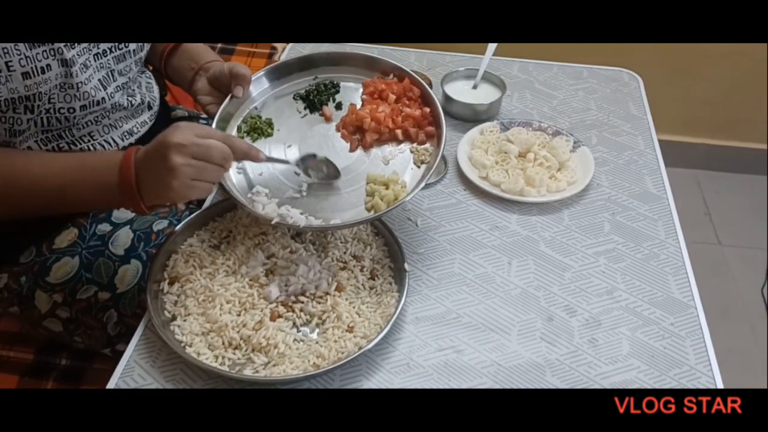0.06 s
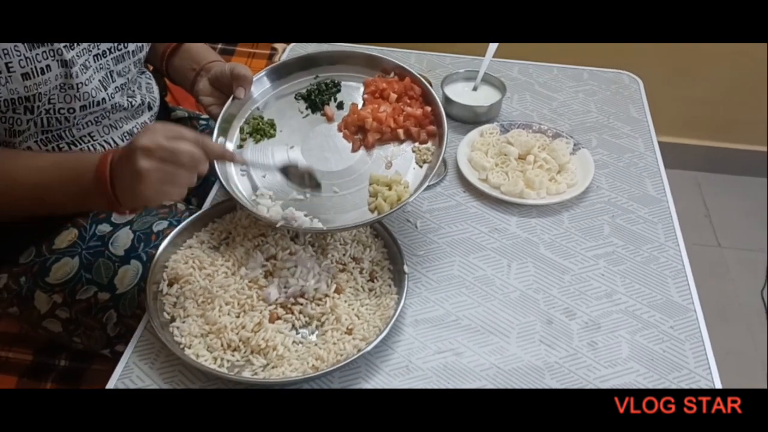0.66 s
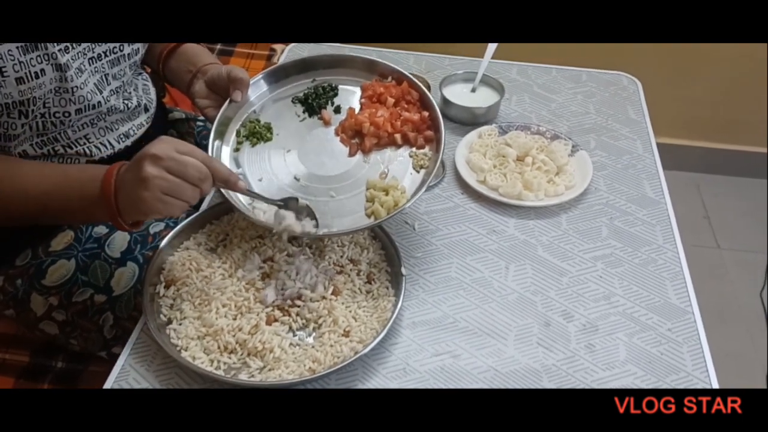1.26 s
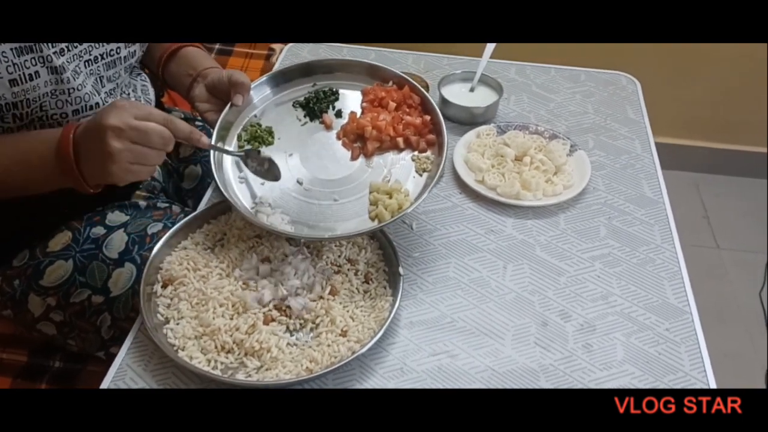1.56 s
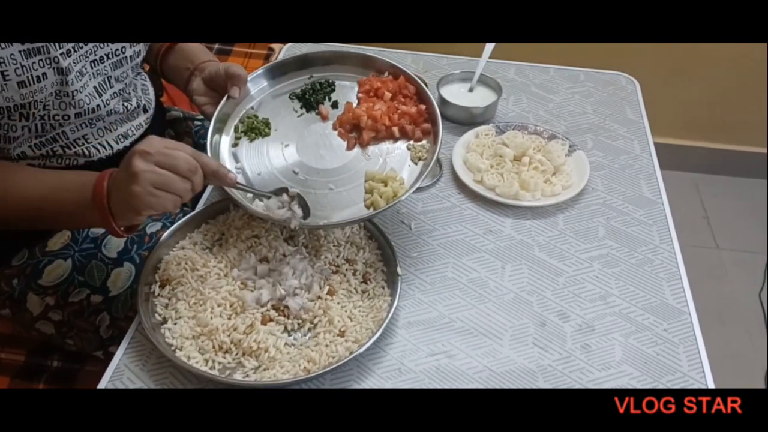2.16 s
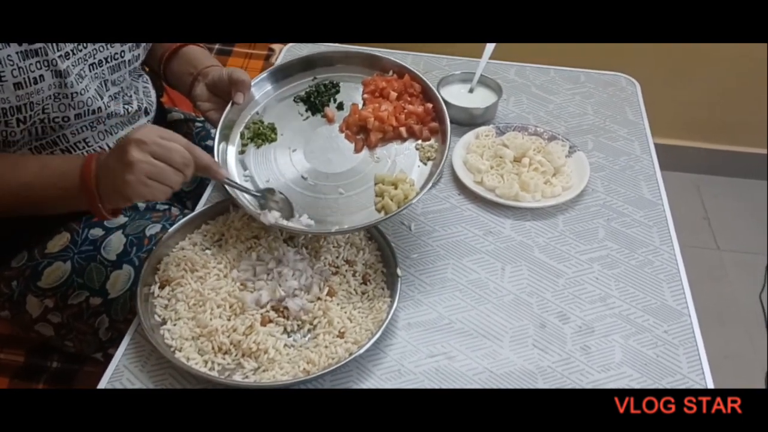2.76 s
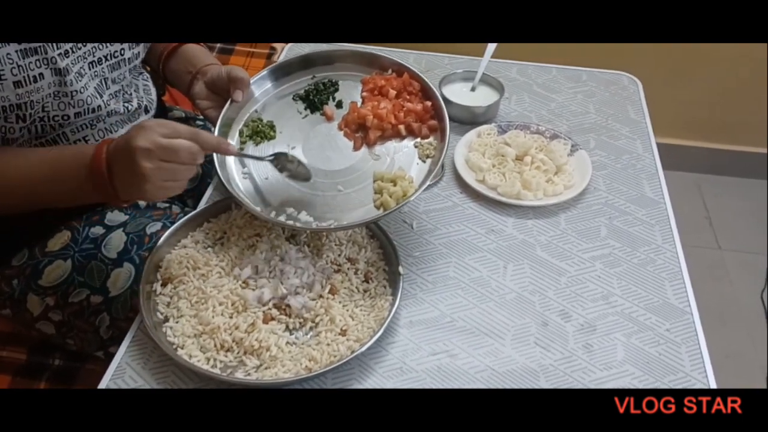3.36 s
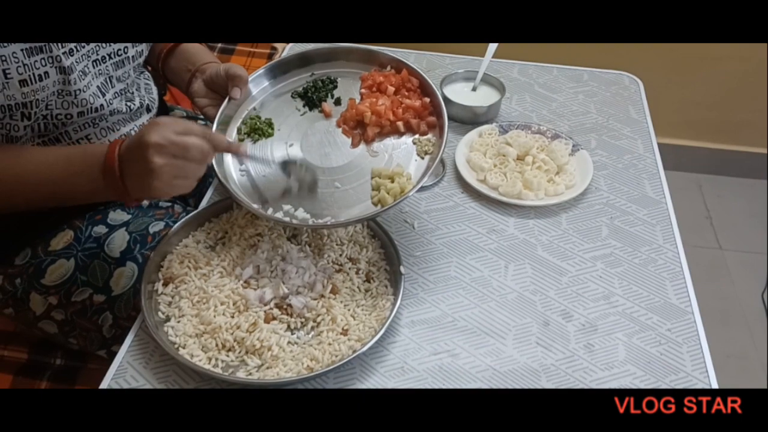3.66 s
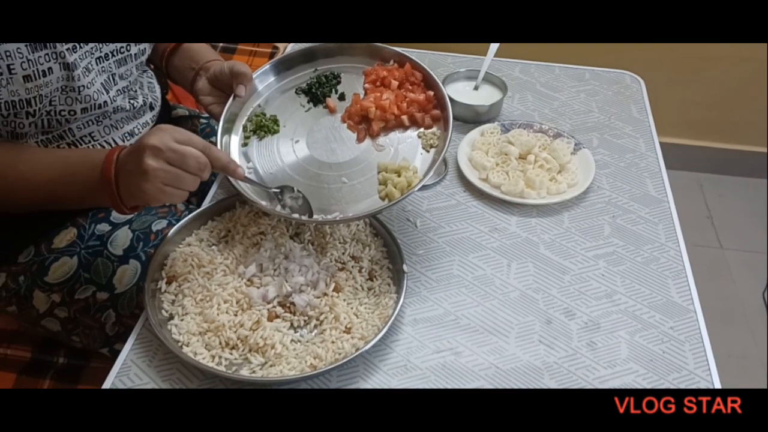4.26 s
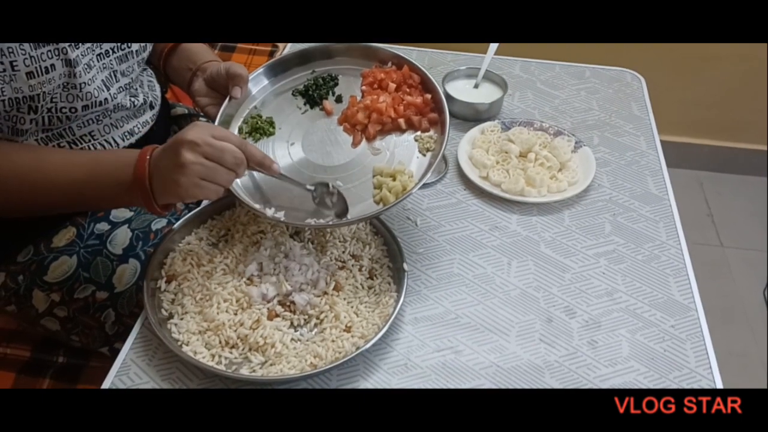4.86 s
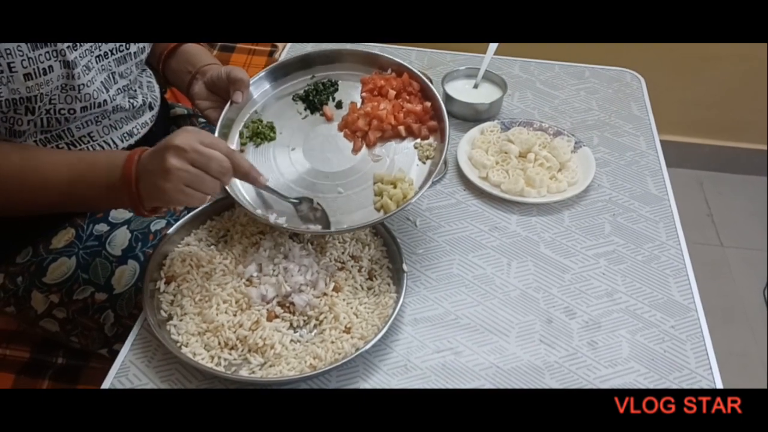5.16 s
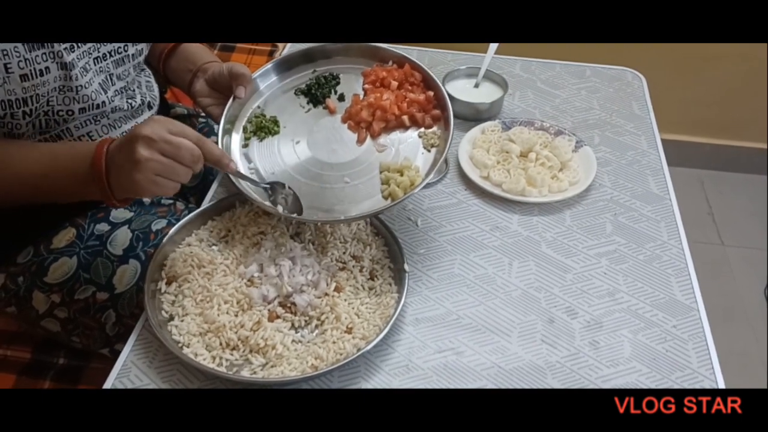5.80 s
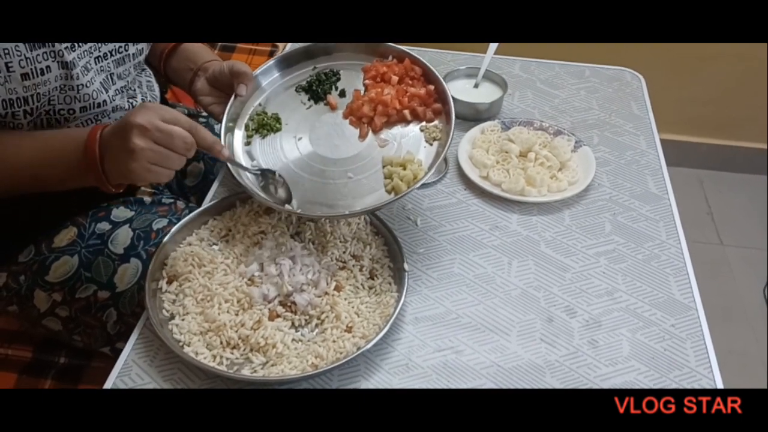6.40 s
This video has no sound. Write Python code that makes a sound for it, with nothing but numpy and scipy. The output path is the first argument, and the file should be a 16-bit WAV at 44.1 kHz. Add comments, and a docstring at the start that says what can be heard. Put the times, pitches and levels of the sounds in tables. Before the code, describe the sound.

A steel spoon clacks and scrapes across a ringing steel tray, stroke after stroke, in a small kitchen with faint swishes behind.

```python
"""A small, hard-walled kitchen, one microphone near a hand-held steel tray of chopped onion.
From the start a narrow swish, sinking in pitch, returns in the background about every 0.75 s.
In front a steel spoon lands with a clack, drags over the damped floor, then climbs the ringing rim,
stroke after stroke. From 1.6 s onion now and then drops softly into a bowl. At 5 s comes a dull
handling bump, and at 6.4 s a last clack and short drag die away in the room."""
import sys
import numpy as np
from scipy import signal
from scipy.fft import rfft, irfft
from scipy.io import wavfile
from scipy.ndimage import map_coordinates

SR = 44100
rng = np.random.default_rng(int(sys.argv[2]) if len(sys.argv) > 2 else 0)


def wav_out(sig):
    """Save sig, one row per channel (or a flat mono array), as 16-bit PCM at SR to the path in sys.argv[1]."""
    wavfile.write(sys.argv[1], SR, np.round(np.clip(np.atleast_2d(sig).T, -1, 1) * 32767).astype(np.int16))


N = 288192
TIME = np.arange(N) / SR
TAPS = 4096  # length of the steel's impulse response
BINS = np.fft.rfftfreq(TAPS, 1 / SR)

# Levels in all tables are relative; the functions set the balance at the microphone.
# Modes of the tray floor, pressed at its centre, near its edge and at its lower end.
# Each row: frequency in Hz, width in Hz, level in dB.
CENTRE = [(511, 38, -9), (760, 180, -7.5), (1098, 150, -14.5), (1633, 137, -9), (2580, 290, -8),
          (2960, 300, -8.5), (3650, 280, -4), (4720, 370, -7.5), (5420, 700, -17), (6900, 230, -8),
          (8230, 610, -15), (9150, 700, -18.5), (11470, 270, -8), (11980, 390, -13.5), (13800, 680, -8),
          (14520, 700, -23)]
EDGE = [(570, 83, -6.5), (983, 190, -6), (1883, 134, -2.5), (2395, 314, -0.5), (3590, 280, -2),
        (4060, 210, -6.5), (4970, 190, -4.5), (5440, 440, -2), (6350, 640, -13), (8250, 600, -16.5),
        (10030, 340, -11.5), (11180, 570, -13.5), (12400, 400, -19.5), (13560, 430, -10.5),
        (14330, 700, -17), (15080, 700, -21.5)]
LOWER = [(452, 51, -6.5), (540, 110, -1), (720, 120, 0), (960, 360, -6), (1750, 370, -4.5), (2780, 470, -1),
         (3300, 260, -1.5), (3760, 440, -6.5), (4950, 320, -0.5), (5610, 250, -6), (6950, 560, -5.5),
         (8170, 440, -13), (9640, 660, -12.5), (11870, 800, -7.5), (12900, 540, -7), (14600, 720, -12)]
# Modes of the free rim. Each row: frequency in Hz, width in Hz, level in dB.
RIM = [(1340, 260, -25), (1810, 195, -17.5), (2466, 370, -9.5), (3240, 270, -10), (3400, 260, -25),
       (3797, 150, -6), (4334, 230, -4), (4820, 210, -6), (5370, 220, -8), (5810, 230, -7.5),
       (6290, 120, -7.5), (6710, 49, -5.5), (7170, 400, -13.5), (7820, 46, -10), (8300, 90, -12.5),
       (8700, 71, -13.5), (9110, 400, -18), (9390, 83, -12), (9870, 120, -17), (10350, 110, -13),
       (11000, 140, -17.5), (11240, 69, -9), (11670, 160, -15), (12000, 110, -7.5), (12400, 53, -9),
       (12860, 140, -3), (13900, 61, -6), (13800, 85, -5.5), (14750, 140, -12), (15300, 340, -18)]
# Whole-tray modes that the hand hardly damps. Each row: frequency in Hz, width in Hz, level in dB.
TRAY_MODES = [(425, 20, 0), (505, 10, -3), (584, 9, -2), (660, 14, -3), (715, 12, 0), (868, 9, 3),
              (965, 14, -5), (1160, 27, -3), (1627, 10, 0), (3679, 20, -2), (6920, 20, -6)]
# The rim's longest-ringing modes. Each row: frequency in Hz, level in dB.
SINGING_MODES = [(4802, -63.5), (5782, -62), (6234, -63), (6643, -68), (7833, -67), (8231, -71.5),
                 (8646, -74), (11138, -73.5), (12075, -63), (13011, -61), (13501, -69.5), (13991, -72)]
# The spoon drags over the floor. Each row: start, rise and hold in seconds, fade in dB per second,
# pressure in dB, low thrum and treble bite in dB above that pressure, modes of the spot pressed.
FLOOR_DRAGS = [(0.164, 0.017, 0.14, 232, -44, 1.5, 0, CENTRE),
               (0.93, 0.057, .11, 165, -41, 1.5, -1, CENTRE),
               (1.784, 0.012, 0.013, 112, -53.5, 2.5, 0, EDGE),
               (2.042, 0.1, 0.037, 202, -64, -10, 9.5, EDGE),
               (2.641, 0.022, 0.021, 120, -49.5, 0.5, -5, EDGE),
               (2.907, .03, 0.11, 144, -66, -32, -1, EDGE), (3.631, 0.055, 0.12, 298, -42, 2, -0.5, LOWER),
               (4.102, 0.021, 0.053, 155, -48, -4, 1, LOWER),
               (4.32, 0.033, 0.025, 196, -58, -19, 0.5, EDGE),
               (4.862, 0.012, 0.023, 86, -54.5, 0, -5, LOWER),
               (5.129, 0.037, 0.026, 200, -67, -22, 3, LOWER),
               (5.191, 0.032, 0.056, 200, -57.5, -24, -8, RIM),
               (5.673, .01, .03, 102, -55.5, -10.5, -4, EDGE),
               (5.752, 0.022, 0.015, 177, -60.5, -25, 12, EDGE),
               (6.413, 0.013, 0.022, 205, -55, -24, -3.5, EDGE)]
# The spoon lands or skips. Each row: time in seconds, level in dB, brightness in dB per octave.
FLOOR_CLACKS = [(0.1661, -33, -2.5), (0.928, -60, -5), (1.0124, -24, 3), (1.7834, -28, 1.5),
                (2.6437, -25, 1.5), (3.6322, -34.5, -1.5), (3.7844, -26, 2.5), (3.79, -29, 1.5),
                (3.7965, -22, 11), (4.1049, -30.5, 1), (4.863, -30.5, 3), (5.675, -32.5, 1),
                (6.4122, -33.5, 2.5)]
# The spoon climbs the wall and crosses the lip. Each row: start, climb and hold in seconds,
# hiss in dB, delay from the end of the hold to the lip in seconds, rasp in dB.
RIM_SWEEPS = [(0.478, 0.037, 0.01, -41.5, 0.027, -43), (1.286, 0.035, 0.024, -39.5, 0.024, -41),
              (2.114, 0.067, 0.053, -42.5, 0.018, -44.5), (3.034, 0.023, 0.0087, -43, 0.054, -59),
              (4.399, 0.068, 0.061, -46, .001, -39.5), (5.253, 0.078, 0.011, -44, 0.0042, -44),
              (5.846, 0.022, 0.0095, -51, 0.00092, -80)]
# The spoon knocks or grazes the rim.
# Each row: time in seconds, level in dB, brightness in dB per octave, rattle decay in seconds.
RIM_CLINKS = [(0.4765, -23.5, -0.5, 0.0084), (1.2389, -27.5, -2.5, 0.005), (2.824, -42, 0, 0.0031),
              (3.1208, -28.5, 2, 0.013), (4.4664, -31.5, 13, 0.0086), (5.0134, -37.5, 9.5, 0.0016)]
# The spoon's tip chatters on the steel.
# Each row: start and length in seconds, level in dB, first pitch, last pitch and width in Hz.
TIP_SQUEAKS = [(1.012, 0.006, -32.5, 3710, 3710, 665), (2.024, 0.13, -68.5, 4470, 3500, 450),
               (3.783, .028, -38.5, 4770, 4920, 800), (4.39, 0.12, -58, 4490, 3720, 920),
               (5.843, 0.037, -60.5, 5260, 4680, 800)]
# Onion drops into the bowl. Each row: start in seconds, level in dB, decay in seconds.
ONION_PLOPS = [(1.555, -65, 0.05), (1.621, -72, 0.032), (2.401, -72, 0.027), (4.64, -83, 0.042)]
# The soft body of one plop. Each row: frequency in Hz, level in dB.
PLOP_SPECTRUM = [(40, -37.5), (110, -0.5), (170, -4.5), (280, -5.5), (450, -16.5), (900, -27), (3000, -35)]
# The handling bump. Each row: frequency in Hz, level in dB, time to fall 60 dB in seconds.
BUMP_MODES = [(81.5, -45.5, 0.11), (202, -42.5, 0.019), (800, -49, 0.014), (868, -69, 0.46)]
# The swishes behind the tray. Each row: start in seconds, level in dB.
BACKGROUND_SWISHES = [(-.4, -41.5), (0.205, -49), (.852, -50.5), (1.489, -52), (2.147, -51.5),
                      (2.94, -51.5), (3.671, -50), (4.5, -49), (5.165, -49.5), (6.021, -50.5)]
# The wide hiss around each swish. Each row: frequency in Hz, level in dB.
SWISH_HISS_SPECTRUM = [(300, -54.5), (1200, 3.5), (1450, -33.5), (2400, -2), (3000, 2.5), (3800, 2),
                       (5200, 4.5), (7000, -4.5), (9500, -16), (15000, -23.5)]
# The kitchen's reverberation. Each row: frequency in Hz, time to fall 60 dB in seconds.
KITCHEN_DECAY = [(200, 0.37), (800, 0.41), (2500, 0.49), (5000, 0.42), (9000, 0.38), (14000, 0.23)]
# The kitchen's room tone. Each row: frequency in Hz, spectral density in dB.
ROOM_TONE_SPECTRUM = [(30, -38), (50, -22.5), (80, -8.5), (115, 3.5), (160, -8), (250, -9.5), (400, -18),
                      (800, -22.5), (1500, -32.5), (4000, -37), (15000, -34)]

DRAG_TOUCH_DB, DRAG_SAG_DB_PER_S = -17, 8.5  # light first contact; the hand eases as it travels
THRUM_DB_PER_S, BITE_DB_PER_S = -65.5, 15.5  # toward the stiff wall the thrum dies and the treble grows
RELEASE_DB = 35  # a drag ends once it has faded by this much
LIFT_S, LIFT_DB = 0.012, -10  # the spoon leaves the floor just before it skips
CLIMB_TOUCH_DB, CLIMB_FADE_DB_PER_S, CLIMB_BODY_DB = -21.5, 425.5, -8  # body: mid band against the hiss
LIP_TOUCH_DB, LIP_RISE_S, LIP_HOLD_S, LIP_FADE_DB_PER_S, LIP_BITE_DB = -18.5, 0.027, 0.013, 387, -21
SWISH_S, SWISH_RISE_S, SWISH_FADE_DB = 0.52, 0.04, -16.5  # swells quickly, then fades ever faster


def tray_floor(level_db=-1, null_hz=1356, null_width_hz=178):
    """Drags and clacks ring the whole tray, which hardly radiates between its low and middle modes."""
    ringing = linger(drags() + clacks(), TRAY_MODES, level_db=0)
    null = signal.iirnotch(null_hz, null_hz / null_width_hz, fs=SR)
    return amp(level_db) * signal.lfilter(*null, ringing)


def drags(level_db=-4):
    """The spoon's edge judders across the floor of the tray."""
    bands = [(120, 1350, 400, 1200), (1350, 9000, 3200, 7500), (10300, 20000, 11000, 15500)]
    out = np.zeros(N)
    for start, rise, hold, fade, db, thrum_db, bite_db, modes in FLOOR_DRAGS:
        t = np.arange(0, rise + hold + RELEASE_DB / fade, 1 / SR)
        now = start + t
        lifted = np.any([(now < skip) & (now > skip - LIFT_S) for skip, _, _ in FLOOR_CLACKS], axis=0)
        push = stroke(t, DRAG_TOUCH_DB, rise, hold, fade)
        pressure = db + push - DRAG_SAG_DB_PER_S * t + LIFT_DB * lifted
        thrum = pressure + thrum_db + THRUM_DB_PER_S * t
        bite = pressure + bite_db + BITE_DB_PER_S * t
        grit = friction(SR, slips_per_s=1100, spread_db=2.8, smooth=0.45)[:len(t)]
        drive = grit * flutter(len(t), per_s=140, depth_db=2.5)
        sound = scrape(drive, [thrum, pressure, bite], ring(modes), bands)
        add(out, start, slide(sound, depth=0.0122, turns_per_s=4))
    return amp(level_db) * out


def clacks(level_db=-11):
    """Each blow on the floor rings the spot pressed by the drag that starts nearest in time."""
    out = np.zeros(N)
    for start, db, tilt in FLOOR_CLACKS:
        *_, modes = min(FLOOR_DRAGS, key=lambda drag: abs(drag[0] - start))
        add(out, start, blow(modes, db + level_db, tilt, rattle=2.4, rattle_s=0.005))
    return out


def tray_rim(ring_db=3, width_hz=22, level_db=0.3):
    """Sweeps and clinks leave the rim singing."""
    loudest_db = max(db for _, db in SINGING_MODES)
    modes = [(hz, width_hz, db - loudest_db) for hz, db in SINGING_MODES]
    return amp(level_db) * linger(sweeps() + clinks(), modes, ring_db)


def sweeps(level_db=-3):
    """The spoon hisses up the tray's wall, then rasps over the lip."""
    bands = [(500, 9000, 3200, 7500), (10300, 20000, 11000, 15500)]
    out, t = np.zeros(N), np.arange(SR // 3) / SR
    for start, climb, hold, hiss_db, delay, rasp_db in RIM_SWEEPS:
        hiss = hiss_db + stroke(t, CLIMB_TOUCH_DB, climb, hold, CLIMB_FADE_DB_PER_S)
        lip_start = climb + hold + delay - LIP_RISE_S
        rasp = rasp_db + stroke(t - lip_start, LIP_TOUCH_DB, LIP_RISE_S, LIP_HOLD_S, LIP_FADE_DB_PER_S)
        middle = np.maximum(hiss + CLIMB_BODY_DB, rasp)
        treble = np.maximum(hiss, rasp + LIP_BITE_DB)
        grit = friction(len(t), slips_per_s=1400, spread_db=2.5, smooth=0.37)
        drive = grit * flutter(len(t), per_s=160, depth_db=2.5)
        add(out, start, scrape(drive, [middle, treble], ring(touched(RIM)), bands))
    return amp(level_db) * out


def clinks(level_db=-11):
    """The spoon knocks the free rim and rattles briefly against it."""
    out = np.zeros(N)
    for start, db, tilt, rattle_s in RIM_CLINKS:
        add(out, start, blow(touched(RIM), db + level_db, tilt, rattle=2.2, rattle_s=rattle_s))
    return out


def squeaks():
    """The spoon's tip sticks and slips on one resonance of the tray."""
    out = np.zeros(N)
    for start, length, db, first_hz, last_hz, width_hz in TIP_SQUEAKS:
        progress = np.arange(0, length, 1 / SR) / length
        squeak = glide(progress, first_hz, last_hz, width_hz)
        add(out, start, amp(db) * squeak * signal.windows.tukey(len(squeak), 0.4))
    return out


def stroke(t, touch_db, rise_s, hold_s, fade_db_per_s):
    """Level in dB of one push of the hand: it builds from a light touch, holds, and lets go."""
    return touch_db * np.maximum(1 - t / rise_s, 0) - fade_db_per_s * np.maximum(t - rise_s - hold_s, 0)


def friction(size, slips_per_s, spread_db, smooth):
    """Tiny slips of uneven size over a smooth rub."""
    slipping = rng.random(size) < slips_per_s / SR
    strength = np.minimum(rng.exponential(1, size), 3.5)
    slips = slipping * amp(spread_db * strength) * rng.choice([-1, 1], size)
    return unit(unit(slips) + smooth * rng.standard_normal(size))


def scrape(drive, levels_db, response, bands):
    """Friction rings the steel; each band (edges, then core, in Hz) follows its own level."""
    out, power = 0, abs(rfft(response)) ** 2
    for db, (low, high, core_low, core_high) in zip(levels_db, bands):
        core_strength = np.sqrt(np.mean(power * (BINS > core_low) * (BINS < core_high)))
        band = signal.sosfilt(signal.butter(4, [low, high], "bandpass", fs=SR, output="sos"), response)
        out = out + signal.fftconvolve(drive * amp(db), band / core_strength)
    return out


def slide(sound, depth, turns_per_s):
    """The resonances wander as the point of contact travels."""
    t = np.arange(len(sound)) / SR
    speed = 1 + depth * np.sin(2 * np.pi * (turns_per_s * t + rng.random()))
    return map_coordinates(sound, [np.cumsum(speed)], order=5)


def blow(modes, db, tilt_db, rattle, rattle_s):
    """One contact and a few milliseconds of rattle ring the steel."""
    t = np.arange(TAPS // 4) / SR
    chatter = rng.standard_normal(len(t)) * np.exp(-t / rattle_s)
    force = (t == 0) + rattle * chatter / np.linalg.norm(chatter)
    sound = signal.fftconvolve(force, ring(modes, tilt_db))
    attack_rms = np.sqrt(np.mean(sound[:TAPS // 16] ** 2))
    return amp(db) * sound / attack_rms


def touched(modes, vary_db=2):
    """Each point of contact favours other modes."""
    hz, width, db = np.transpose(modes)
    return np.transpose([hz, width, db + vary_db * rng.standard_normal(len(db))])


def ring(modes, tilt_db=0):
    """Impulse response of a set of steel resonances, tilted by tilt_db per octave."""
    hz, width, db = np.transpose(modes)[:, :, None]
    power = (amp(db) ** 2 / (1 + ((BINS - hz) / (0.79 * width)) ** 2) ** 1.71).sum(0)
    tilt = amp(tilt_db * np.log2((BINS + 200) / 4000))
    bass_loss = 1 + (260 / (BINS + 1)) ** 3  # a thin plate radiates little bass
    gain = np.sqrt(power) * tilt / bass_loss
    # Minimum phase: the ring follows the contact and never precedes it.
    cepstrum = irfft(np.log(gain + 1e-5))
    cepstrum[1:TAPS // 2] *= 2
    cepstrum[TAPS // 2 + 1:] = 0
    return irfft(np.exp(rfft(cepstrum)))


def linger(sound, modes, level_db):
    """Lightly damped modes take up the sound and ring on."""
    out = sound
    for hz, width, db in modes:
        radius = np.exp(-np.pi * width / SR)
        pole = radius * np.exp(2j * np.pi * hz / SR)
        ringing = signal.lfilter([1 - radius], [1, -pole], sound + 1e-15).real
        out = out + 2 * amp(db + level_db) * ringing
    return out


def plops(crackle_db=-4):
    """Onion pats softly onto the bowl's contents, with a few wet ticks."""
    out, t = np.zeros(N), np.arange(SR // 3) / SR
    for start, db, decay in ONION_PLOPS:
        ticks = friction(len(t), slips_per_s=500, spread_db=6, smooth=0.1)
        pat = noise(PLOP_SPECTRUM, len(t)) + amp(crackle_db) * ticks * np.exp(-t / decay)
        swell = (2 * t / decay) * np.exp(1 - 2 * t / decay)
        add(out, start, amp(db) * pat * swell)
    return out


def handling_bump(start_s=4.996):
    """One dull bump of handling: a damped low swing that faintly rings the tray."""
    out, t = np.zeros(N), np.arange(SR // 3) / SR
    swing = sum(amp(db - 60 * t / t60) * np.sin(2 * np.pi * hz * t) for hz, db, t60 in BUMP_MODES)
    add(out, start_s, swing)
    return out


def swishes(hiss_db=-16, level_db=-3):
    """Behind the tray, noise flutters in one sinking resonance with a little wide hiss around it."""
    out, t = np.zeros(N), np.arange(0, SWISH_S, 1 / SR)
    progress = t / SWISH_S
    swell = (1 - np.exp(-t / SWISH_RISE_S)) * amp(SWISH_FADE_DB * progress ** 3)
    for start, db in BACKGROUND_SWISHES:
        resonance = glide(progress, first_hz=2553, last_hz=2271, width_hz=680, wander_hz=90.25)
        hiss = amp(hiss_db) * noise(SWISH_HISS_SPECTRUM, SR)[:len(t)]
        swish = (resonance + hiss) * flutter(len(t), per_s=45, depth_db=2.2)
        add(out, start, swish * swell * amp(db + level_db))
    return out


def kitchen(sound, patterns=8):
    """The tray moves in the hand, so at the microphone one pattern of echoes fades into the next."""
    position = np.linspace(0, patterns - 1, N)
    fades = (np.cos(np.pi / 2 * np.clip(position - k, -1, 1)) for k in range(patterns))
    return sum(signal.oaconvolve(sound * fade, echoes())[:N] for fade in fades)


def echoes(delay_s=0.00099, build_s=0.0014):
    """Dense echoes off hard, close walls, with energy 1; the top treble dies first."""
    hz, t, spectra = signal.stft(rng.standard_normal(SR * 2 // 3), SR, nperseg=256)
    decay = amp(-60 * t / curve(KITCHEN_DECAY, hz)[:, None])
    _, tail = signal.istft(spectra * decay, SR, nperseg=256)
    tail = tail * np.clip((TIME[:len(tail)] - delay_s) / build_s, 0, 1)
    return tail / np.linalg.norm(tail)


def room_tone(level_db=-75.5):
    """The quiet kitchen: a faint, steady, low noise."""
    return amp(level_db) * noise(ROOM_TONE_SPECTRUM, N)


def glide(progress, first_hz, last_hz, width_hz, wander_hz=0):
    """Noise in one resonance that moves in pitch as progress runs from 0 to 1."""
    size = len(progress)
    slow = signal.butter(2, 35, fs=SR, output="sos")
    wander = unit(signal.sosfilt(slow, rng.standard_normal(SR)))[-size:]
    hz = first_hz + (last_hz - first_hz) * progress + wander_hz * wander
    carrier = np.exp(2j * np.pi * np.cumsum(hz) / SR)
    narrow = signal.butter(3, width_hz / 2, fs=SR, output="sos")
    real, imag = signal.sosfilt(narrow, rng.standard_normal((2, SR)))[:, -size:]
    return unit(((real + 1j * imag) * carrier).real)


def flutter(size, per_s, depth_db):
    """Uneven, quick swings of level."""
    knots = rng.uniform(-1.6, 1.6, 400)
    swing = np.interp(np.arange(size) / SR * per_s, np.arange(len(knots)), knots)
    return unit(amp(depth_db * swing))


def noise(spectrum, size):
    """Noise of rms 1 with the given spectrum."""
    gain = amp(curve(spectrum, np.fft.rfftfreq(size, 1 / SR)))
    return unit(irfft(rfft(rng.standard_normal(size)) * gain, size))


def curve(points, hz):
    """Joins (Hz, value) points on a log-frequency axis."""
    point_hz, values = np.transpose(points)
    return np.interp(np.log(hz + 1), np.log(point_hz + 1), values)


def amp(db):
    """Decibels to gain."""
    return 10 ** (np.asarray(db) / 20)


def unit(x):
    """Scales to rms 1."""
    return x / np.sqrt(np.mean(x ** 2) + 1e-30)


def add(mix, start_s, sound):
    """Mixes a sound in at start_s, trimmed to the ends of the mix."""
    start = round(start_s * SR)
    sound = sound[max(-start, 0):]
    part = mix[max(start, 0):][:len(sound)]
    part += sound[:len(part)]


def scene(swish_send_db=-3):
    """At the microphone, in mono: spoon, tray and onion in front, swishes behind, the room around."""
    front = tray_floor() + tray_rim() + squeaks() + plops()
    behind = swishes()
    walls = kitchen(front + amp(swish_send_db) * behind)
    return (front + behind + walls + handling_bump() + room_tone())[None]


def record(dry, bass_cut_hz=57, band_limit_hz=15850):
    """The microphone's bass cut and the recorder's steep band limit."""
    bass_cut = signal.butter(6, bass_cut_hz, "highpass", fs=SR, output="sos")
    band_limit = signal.firwin(511, band_limit_hz, window=("kaiser", 9), fs=SR)
    return signal.oaconvolve(signal.sosfilt(bass_cut, dry), band_limit[None], "same")


dry = scene()
out = record(dry)
wav_out(out)
```